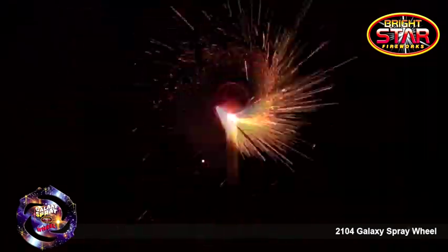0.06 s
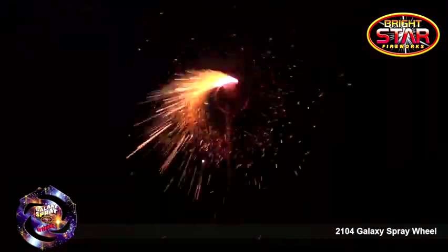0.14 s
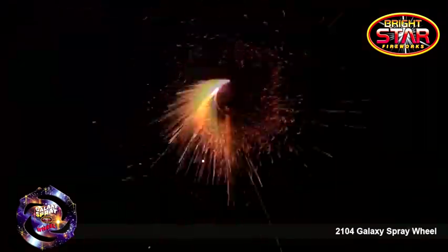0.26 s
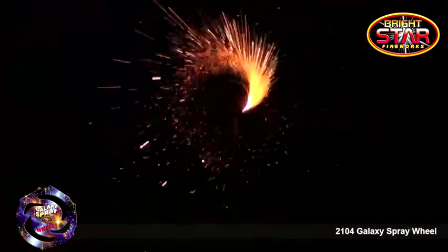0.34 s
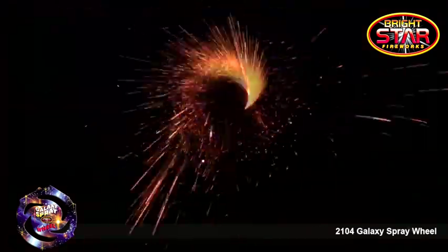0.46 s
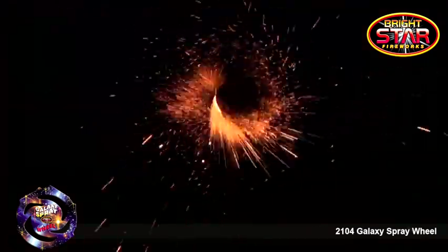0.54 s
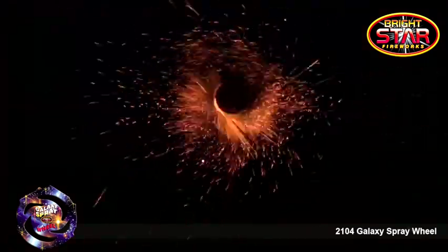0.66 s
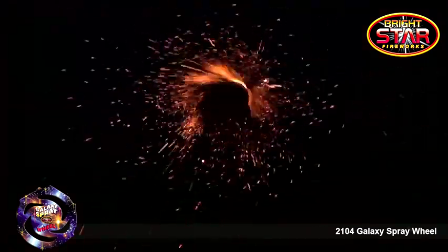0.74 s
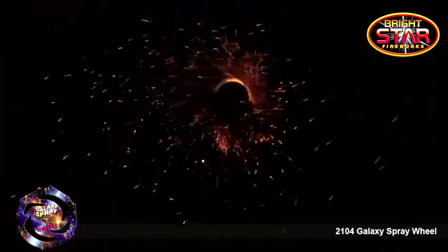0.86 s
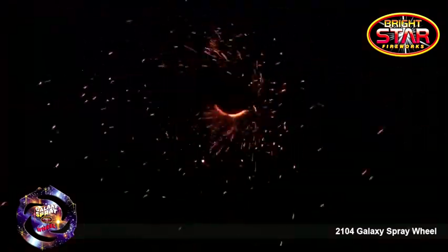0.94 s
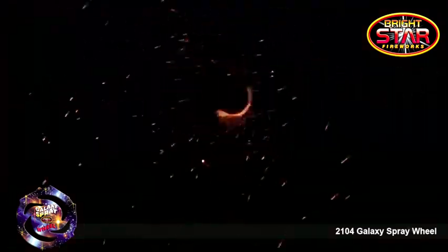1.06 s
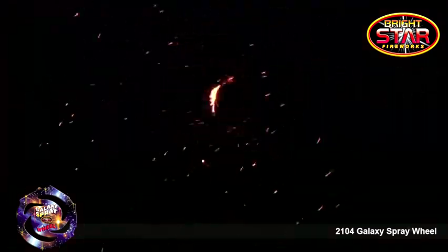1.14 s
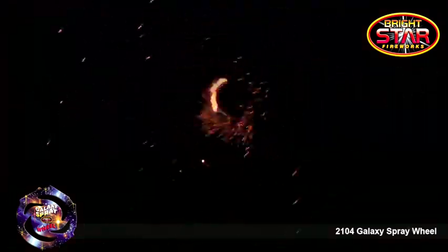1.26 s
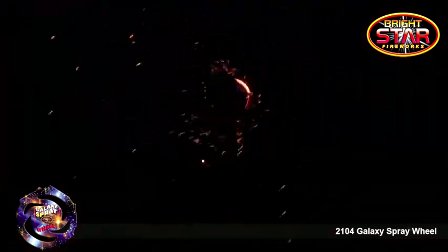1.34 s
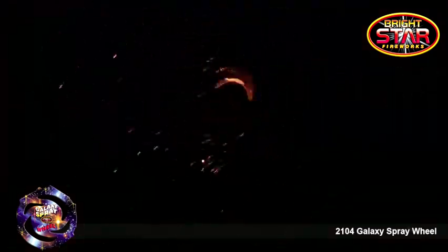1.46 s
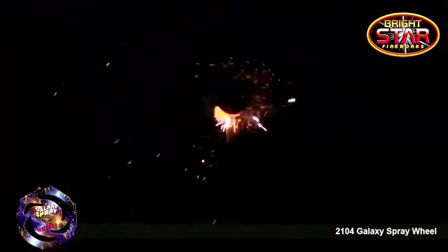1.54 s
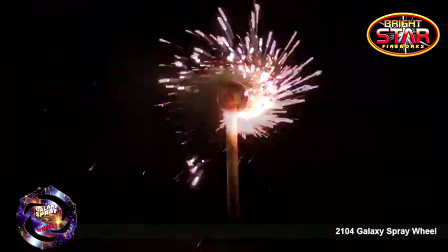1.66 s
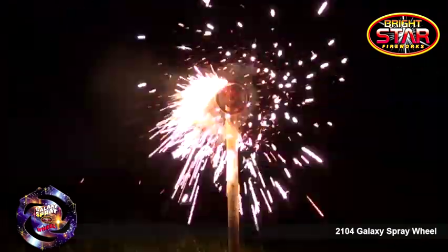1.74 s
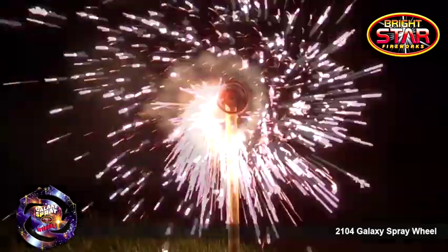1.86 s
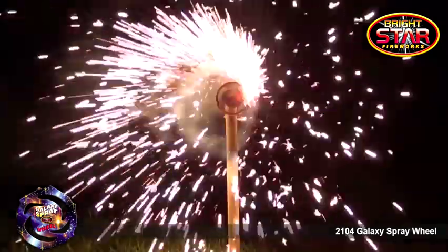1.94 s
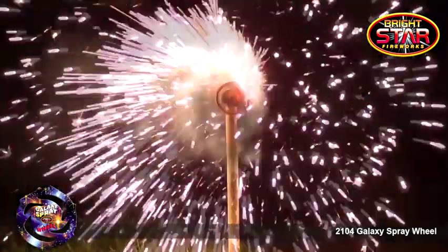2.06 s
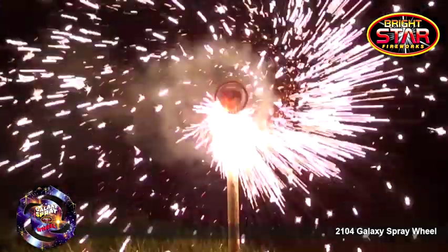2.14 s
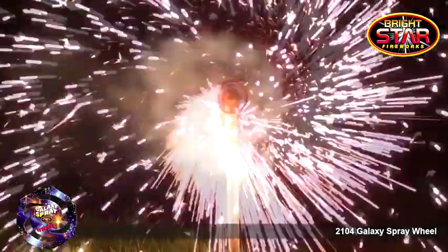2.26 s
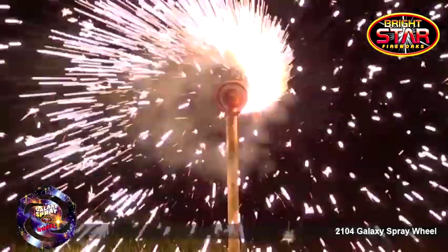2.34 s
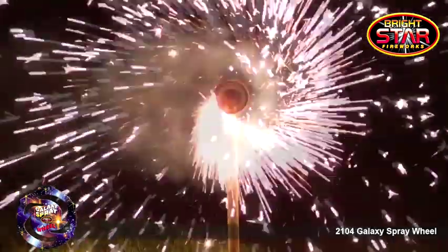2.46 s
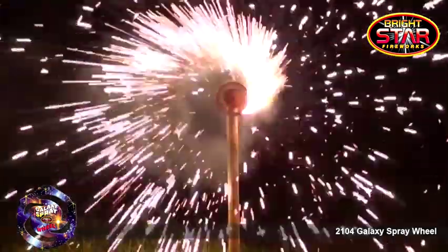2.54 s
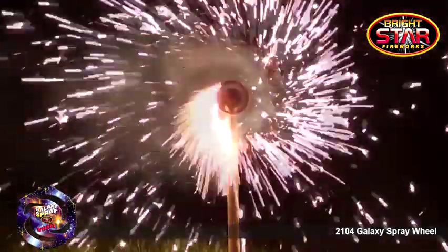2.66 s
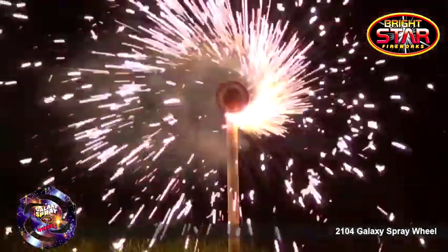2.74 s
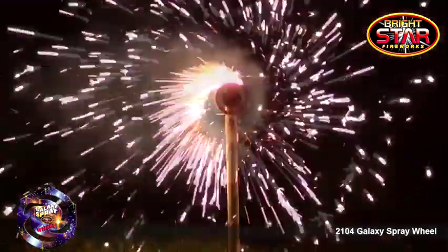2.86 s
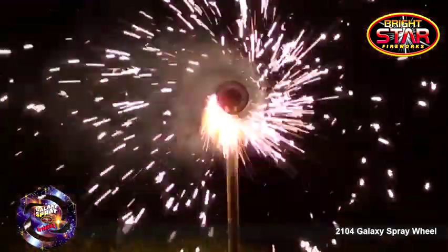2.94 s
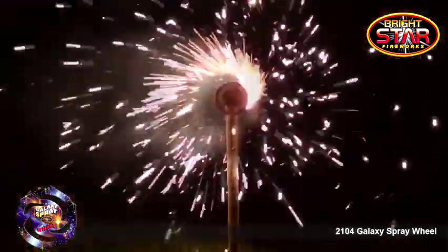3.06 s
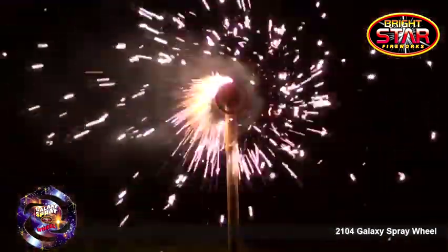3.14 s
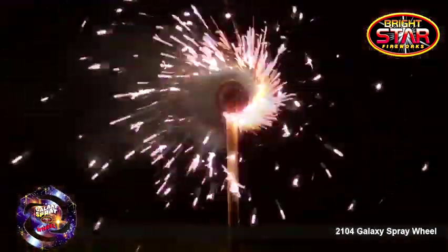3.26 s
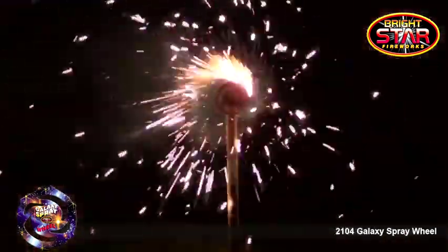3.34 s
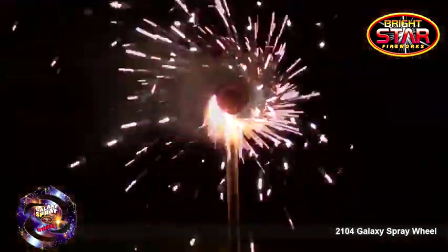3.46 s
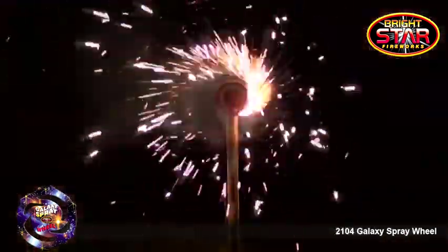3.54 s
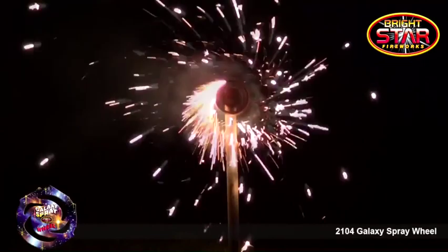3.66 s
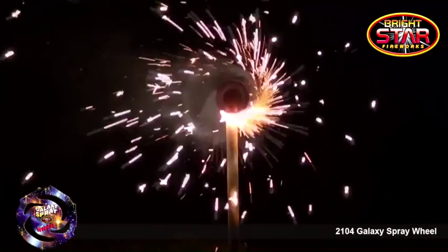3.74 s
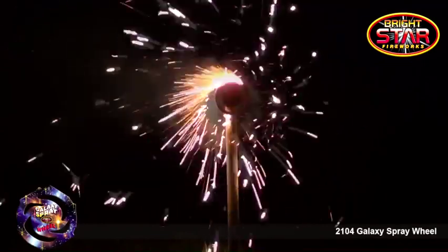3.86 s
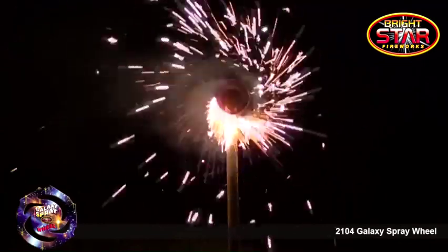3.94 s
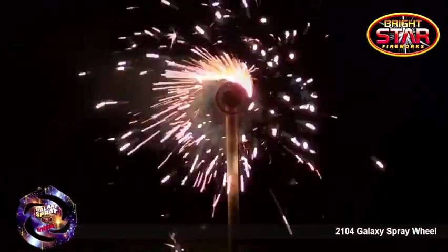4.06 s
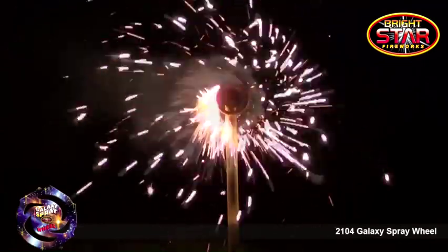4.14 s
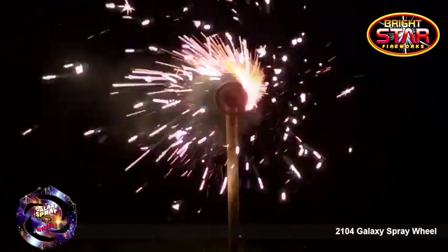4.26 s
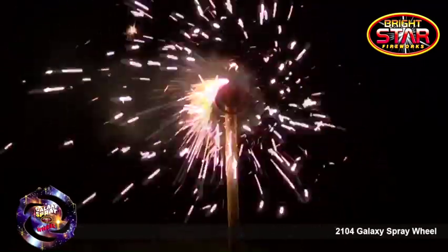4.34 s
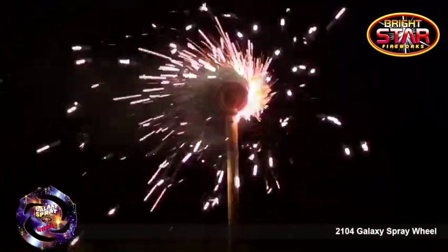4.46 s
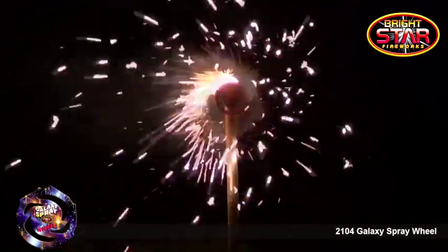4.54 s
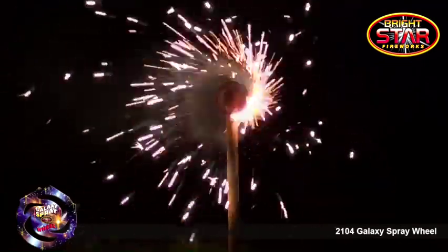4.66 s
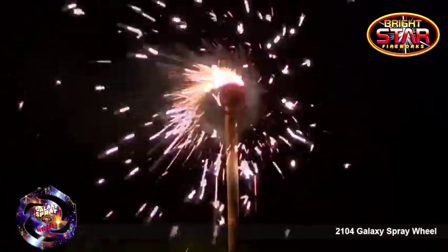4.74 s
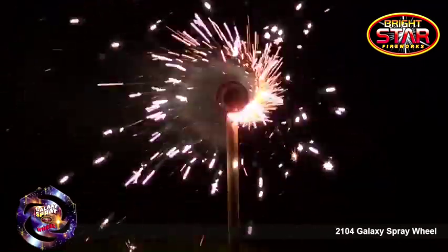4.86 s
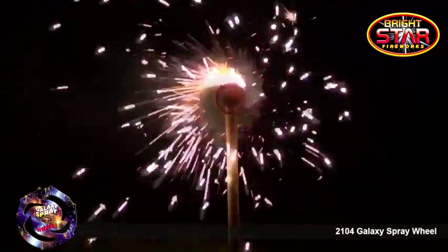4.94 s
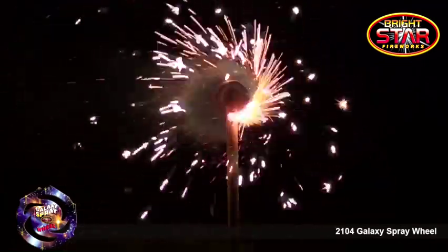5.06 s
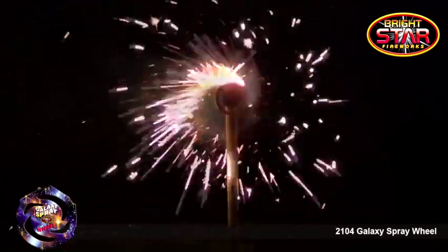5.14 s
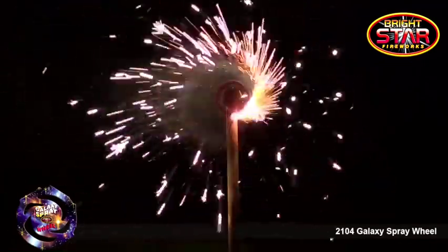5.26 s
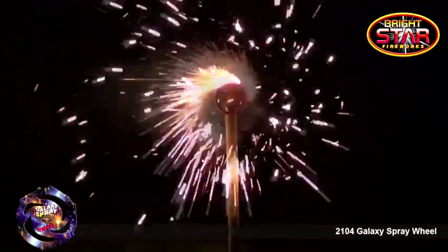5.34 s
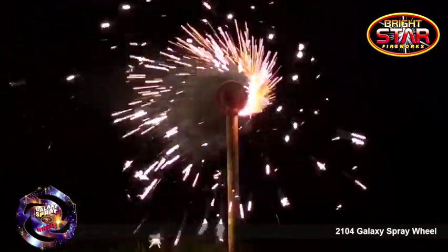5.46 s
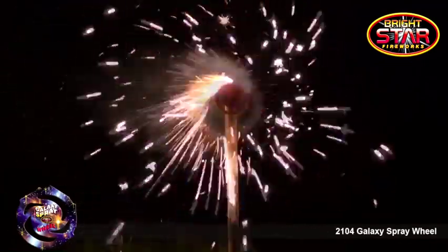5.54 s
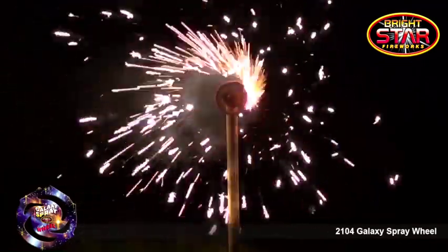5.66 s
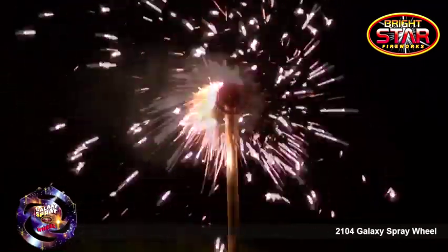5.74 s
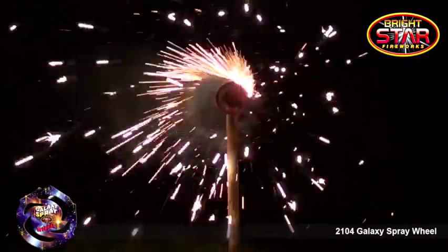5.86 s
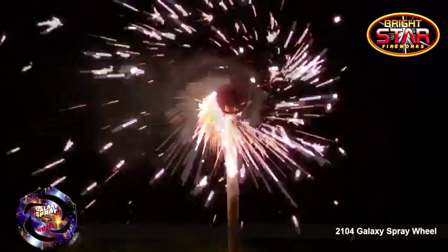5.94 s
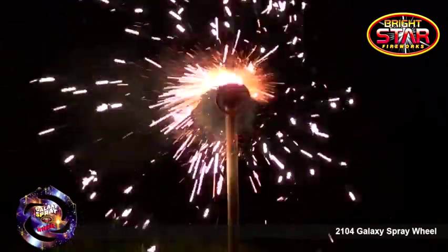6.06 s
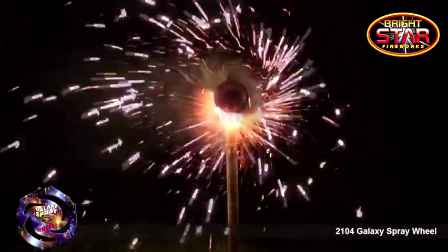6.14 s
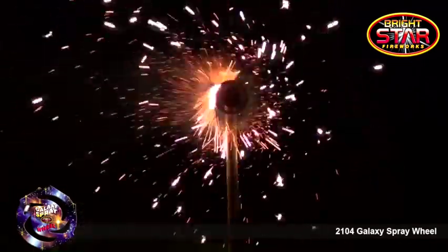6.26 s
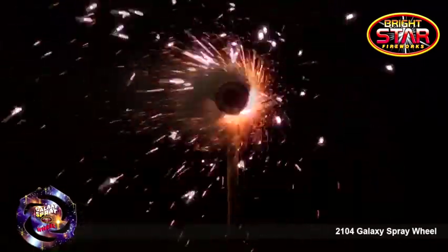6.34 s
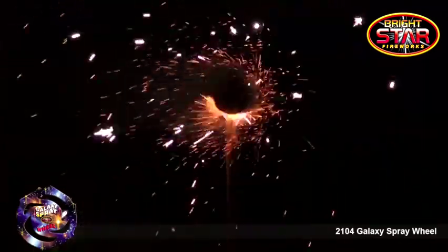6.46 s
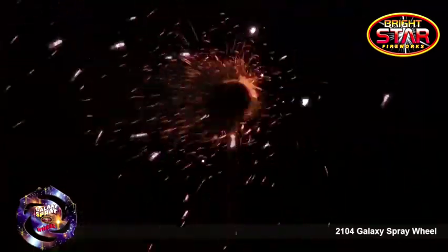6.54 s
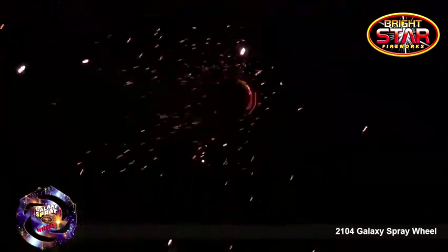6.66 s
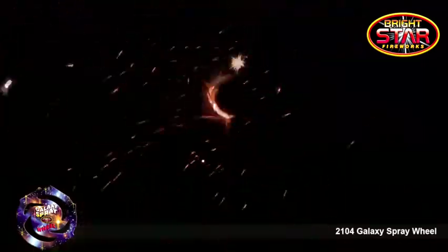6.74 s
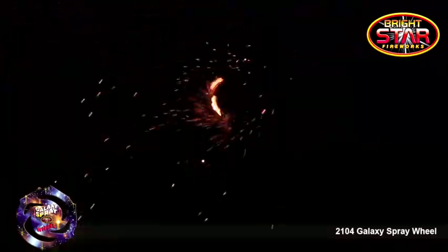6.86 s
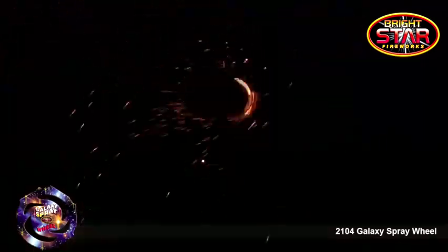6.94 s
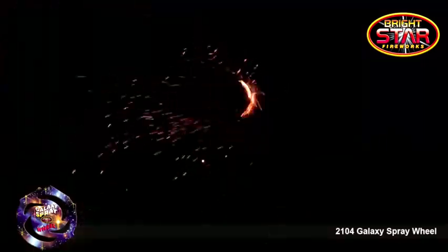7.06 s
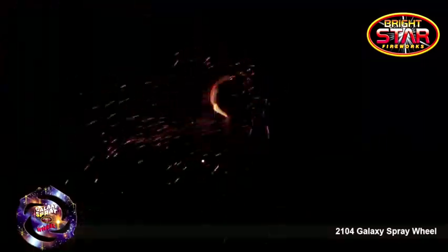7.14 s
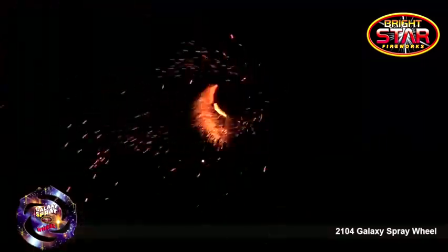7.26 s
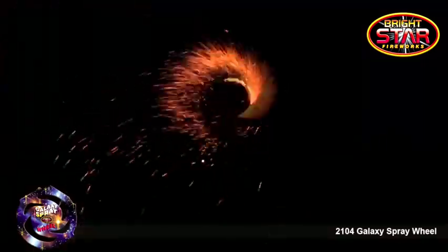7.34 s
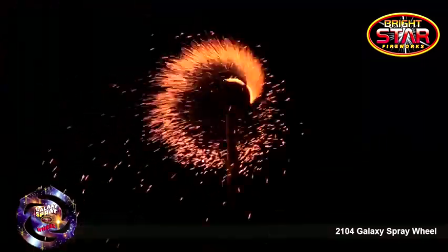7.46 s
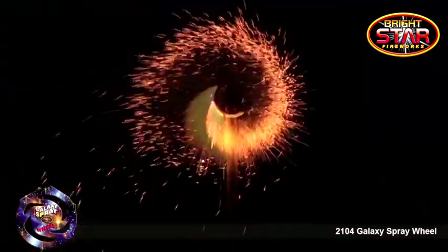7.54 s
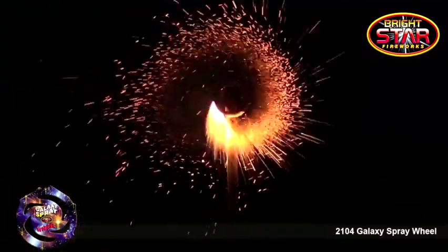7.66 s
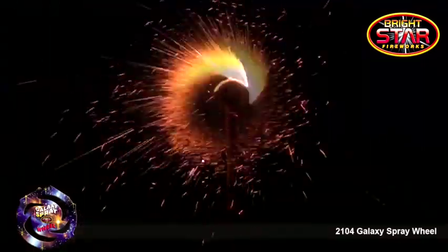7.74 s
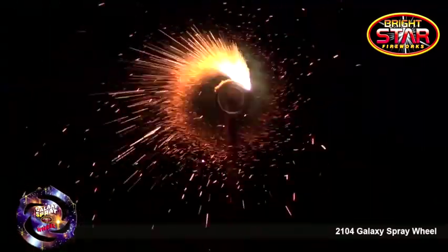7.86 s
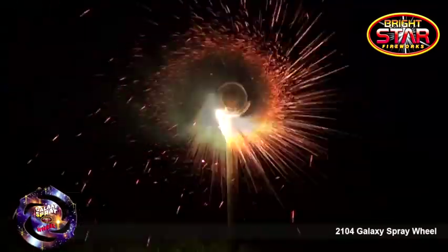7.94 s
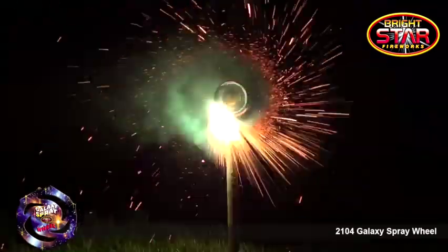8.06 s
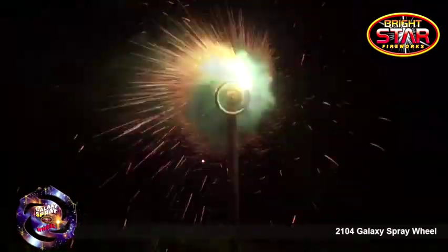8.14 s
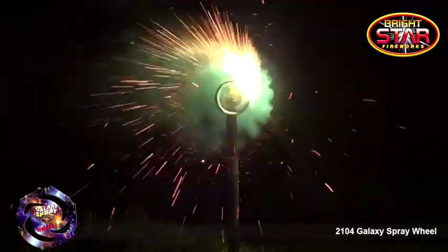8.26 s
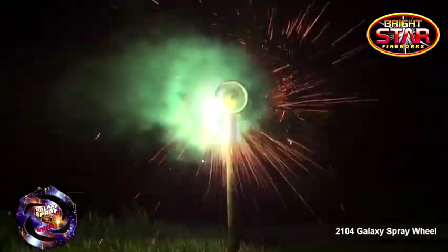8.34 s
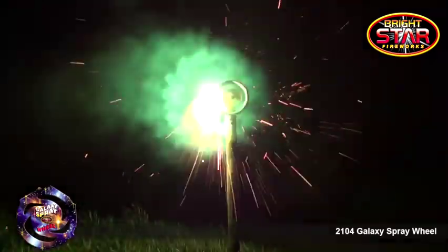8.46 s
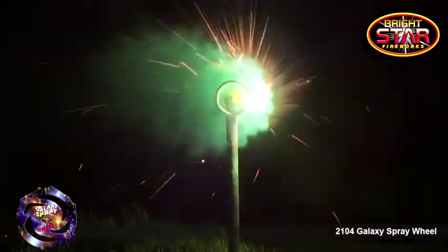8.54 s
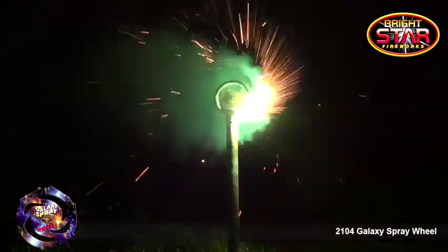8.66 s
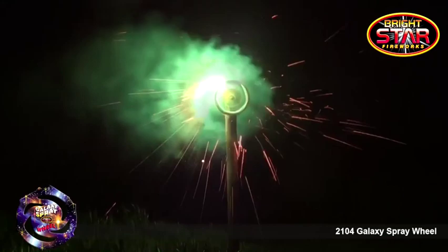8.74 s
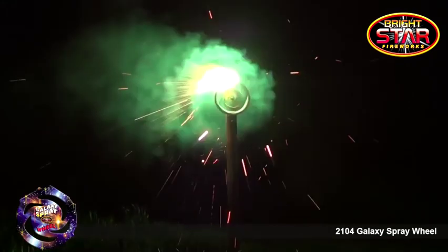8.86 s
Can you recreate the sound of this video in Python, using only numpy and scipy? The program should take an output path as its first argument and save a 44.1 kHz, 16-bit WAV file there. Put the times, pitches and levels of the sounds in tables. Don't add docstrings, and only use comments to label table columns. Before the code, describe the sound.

Harsh, bright gas-jet hiss swirls several times a second outdoors, cut by two quiet sputtering gaps with snapping embers before each roaring return.

```python
import sys
import numpy as np
from scipy import signal
from scipy.fft import rfft, irfft, next_fast_len
from scipy.io import wavfile
from scipy.ndimage import uniform_filter1d, map_coordinates

SR = 44100
rng = np.random.default_rng(int(sys.argv[2]) if len(sys.argv) > 2 else 0)


def gain_from_db(level_db):
    decades = np.asarray(level_db, float) / 20
    return 10 ** decades


def master(y):
    cut = np.clip(np.atleast_2d(y).T, -1, 1)
    pcm = np.round(cut * 32767)
    wavfile.write(sys.argv[1], SR, pcm.astype(np.int16))


N = 392049


def shape(x, *tables):
    size = 2048
    log_hz = np.log(np.fft.rfftfreq(size, 1 / SR) + 1)
    gain_db = sum(np.interp(log_hz, np.log(hz), db) for hz, db in map(np.transpose, tables))
    cepstrum = irfft(gain_db * np.log(10) / 20)
    cepstrum[1:size // 2] *= 2
    cepstrum[size // 2 + 1:] = 0
    response = irfft(np.exp(rfft(cepstrum)))[:size // 2]
    return signal.oaconvolve(x, response)[:len(x)]


def unit(x):
    return x / np.sqrt(np.mean(x ** 2))


def curve(rows):
    s, *columns = np.transpose(rows)
    return [np.interp(np.arange(N) / SR, s, column) for column in columns]


def walk(rate):
    hold = int(SR / rate)
    steps = np.repeat(rng.standard_normal(N // hold + 1), hold)
    return unit(uniform_filter1d(uniform_filter1d(steps, hold), hold)[:N])


def late(x, lag):
    return map_coordinates(x, [np.arange(len(x)) - lag], order=3)


def bumps(s, db, half_s):
    t = np.arange(N) / SR
    power = np.zeros(N)
    for at, peak_db, half in zip(s, db, half_s):
        near = slice(max(int((at - 4 * half) * SR), 0), int((at + 4 * half) * SR))
        power[near] += gain_from_db(2 * peak_db) * np.exp(-2 * ((t[near] - at) / half) ** 2)
    return power


# time in seconds, angle in turns (whole numbers with the nozzle on top).
WHEEL_TURNS = [(0.0, -0.05), (0.404, 2.63), (1.212, 8.36), (1.818, 12.27), (2.223, 15.1), (2.425, 16.98),
               (2.627, 19.04), (3.233, 25.79), (3.839, 32.41), (4.243, 36.71), (4.647, 40.92),
               (5.253, 47.0), (6.061, 54.73), (6.668, 60.13), (6.87, 61.71), (7.88, 68.98), (8.284, 72.07),
               (8.89, 76.89)]


def wheel_angle():
    return 2 * np.pi * curve(WHEEL_TURNS)[0]


def ground_lag(angle):
    mean_ms, swing_ms = 2.065, .16
    return (mean_ms + swing_ms * np.cos(angle)) * SR / 1000


def ground(x, lag):
    grass = [(300, -2.5), (1000, -1.5), (1600, -3), (2500, -5), (5500, -10), (8000, -16), (12000, -28)]
    return x + late(shape(x, grass), lag)


def hub(gas, angle):
    once = .026 * np.cos(angle - 3.46)
    twice = .009 * np.cos(2 * angle - 1.95)
    lag = (.143 + once + twice) * SR / 1000
    blur = signal.windows.gaussian(11, 1.38)
    return gas - .72 * late(np.convolve(gas, blur / blur.sum(), "same"), lag)


# lights in seconds, takes hold in seconds, level then in dB re full,
# full in seconds, cuts out in seconds.
STAGES = [
    (-.5, -.4, -15, -.3, .965),
    (1.425, 1.565, -17, 1.69, 6.49),
    (7.235, 7.46, -9.5, 7.61, 9.5),
]
# time in seconds, hiss in dB, fullness in dB.
THRUST = [(0, -27.5, -4.5), (.32, -28.5, -3), (.42, -28.5, 0), (.55, -28, -10.5), (.8, -28, -11),
          (1.75, -28.5, -2.5), (1.95, -28.5, -1), (2.29, -27.5, -6.5), (2.85, -29.5, -3.5),
          (3.45, -33.5, -0.5), (3.68, -30.5, -4), (3.9, -31, -1.5), (4.3, -29, -4), (5.0, -29, -0.5),
          (5.35, -28, -5.5), (6.0, -29, -1.5), (7.9, -27.5, -4), (8.3, -27, -8)]
# time in seconds, hiss in dB, half length in
# milliseconds, fullness in dB.
SPURTS = [(1.04, -56, 28, 23), (1.088, -55, 19, 18), (1.15, -61, 15, 13), (1.191, -55.5, 24, 9),
          (1.228, -57, 33, 14), (1.297, -55, 21, 11.5), (1.511, -46, 9.2, -39), (6.36, -42.5, 120, 12.5),
          (6.543, -55.5, 33, 27), (6.59, -49, 17, 5), (6.62, -58, 12, 11), (6.659, -52.5, 10, 0),
          (6.683, -58, 6, 6), (6.755, -53.5, 20, 14), (6.828, -58.5, 40, 10.5), (6.894, -64, 17, 18),
          (6.975, -60, 18, 9), (7.056, -55, 10, -9), (7.09, -62, 24, 11), (7.189, -40, 17, -4),
          (7.315, -42, 58, 7), (7.42, -38.5, 19, 3), (7.166, -53, 14, 3)]
PER_FULLNESS = (.9, .4, .05)


def burn():
    ember_db = -35.5
    rows = []
    for lights, hold, hold_db, full, cut in STAGES:
        rows += [(lights, ember_db), (lights + .04, -18.5), (hold, hold_db), (full, 0)]
        rows += [(cut - .19, 0), (cut, -5.5), (cut + .11, -25.5), (cut + .11 + .09, ember_db)]
    stage_db = curve(rows)[0]
    thrust_db, fullness_db = curve(THRUST)
    weak = 1 - np.exp(stage_db / 5)
    s, spurt_db, half_ms, spurt_full_db = np.transpose(SPURTS)

    def gain(steady_db, extra_db):
        steady = gain_from_db(2 * (thrust_db + stage_db + steady_db))
        return np.sqrt(steady + bumps(s, spurt_db + extra_db, half_ms / 1000))

    layer_db = (-12.5, -7, -4.5)
    weak_gain_db = (2.5, 2, -4)
    roar, rush, fizz = (
        gain(db + per * fullness_db * (1 - weak) + weak_db * weak, db + per * spurt_full_db)
        for db, per, weak_db in zip(layer_db, PER_FULLNESS, weak_gain_db))
    first_charge = np.arange(N) < STAGES[1][0] * SR
    rush = rush * gain_from_db(-3.5 * first_charge * (0.5 - weak))
    return roar, rush, gain(0, 0), fizz


BAND_EDGES_HZ = (1250, 4300, 11000)


def split_bands(x):
    size = next_fast_len(N)
    spectrum = rfft(x, size)
    octave = np.log2(np.fft.rfftfreq(size, 1 / SR) + 1)
    above = [np.clip(.5 + (octave - np.log2(edge)) / .3, 0, 1) for edge in BAND_EDGES_HZ]
    return [unit(irfft(spectrum * (low - high), size)[:N]) for low, high in zip([1] + above, above + [0])]


# frequency in Hz, level in dB.
JET_COLOUR = [(200, -40), (270, -16.5), (420, -12), (1000, -6), (1500, -7.5), (2200, -4), (5000, -7),
              (15500, -5.5)]
# frequency in Hz, gain in dB.
HUB_BALANCE = [(200, 11.5), (420, 8.5), (1000, 2.5), (2200, -1), (3600, -9), (5000, 0.5), (7200, 1.5), (10000, 0)]
# frequency in Hz, gain in dB.
CAMERA_BODY = [(2400, -4.5), (3050, -6.5), (3500, 4.5), (3900, 4), (4300, -6.5), (4650, -1), (6800, 1),
               (7550, -5), (8500, 3), (10100, 2.5), (10600, 0.5), (13200, 1), (14500, -8.5), (15400, -5)]
# frequency in Hz, gain in dB.
LAST_CHARGE = [(6800, -2.5), (8000, -0.2)]
# time in seconds, depth in dB.
THROB = [(0, 0.5), (2.3, 0.1), (3, 0.7), (3.8, 1.2), (4.4, 0.5), (4.9, 0.1), (8.89, 0)]


def jet(angle, lag):
    chance, size = rng.random((N, 2)).T
    sparks = (chance < 1500 / SR) * (2 * size - 1) ** 3
    turbulence = gain_from_db(0.5 * walk(45) + 0.78 * walk(350)) * rng.standard_normal(N)
    gas = hub(turbulence + gain_from_db(-11.5) * unit(sparks), angle)
    heard = ground(shape(gas, HUB_BALANCE, JET_COLOUR, CAMERA_BODY), lag)
    roar, rush, hiss, fizz = split_bands(heard)
    before_last = np.arange(N) < STAGES[-1][0] * SR
    hiss = np.where(before_last, hiss, shape(hiss, LAST_CHARGE))
    roar_gain, rush_gain, hiss_gain, fizz_gain = burn()
    roar = roar * roar_gain * gain_from_db(0.47 * walk(14) + 0.33 * np.cos(angle - 2.7))
    rush = rush * rush_gain * gain_from_db(0.42 * walk(19) + 0.47 * np.cos(angle - .7))
    hiss = hiss * hiss_gain * gain_from_db(.5 * walk(14))
    fizz = fizz * fizz_gain * gain_from_db(0.6 * walk(22))
    throb = gain_from_db(curve(THROB)[0] * np.cos(angle - 4.3))
    return roar + rush + throb * (hiss + fizz)


def scatter(wheel):
    level = np.sqrt(uniform_filter1d(wheel ** 2, size=4000))
    colour = [(200, -51.0), (350, 1.0), (800, -4.0), (1500, -40.0),
              (3500, 2.0), (4600, -2.0), (7000, -15.5), (10000, -45.)]
    return gain_from_db(-36.5) * level * unit(shape(rng.standard_normal(N), colour))


# frequency in Hz, level in dB per Hz.
BREEZE_COLOUR = [(12, -46), (20, -5), (54, -0.5), (112, 3), (193, -1.5), (240, -3.5), (310, -29),
                 (530, -120)]
# time in seconds, peak in dB, half length in seconds.
GUSTS = [(0, -56, .03), (.2, -69, .15), (.38, -62, 0.062), (.57, -67, .05), (0.896, -60.5, .03),
         (0.983, -63, .025), (1.09, -69, .03), (1.28, -76, .08), (1.51, -75, .03), (1.67, -62, .04),
         (1.95, -70, 0.36), (2.7, -71, 0.21), (2.96, -65, .04), (3.15, -69, .05), (4.18, -76, .05),
         (4.4, -70, .05), (4.53, -71, .04), (4.69, -66, .04), (5.0, -71, .18), (5.62, -71, .04),
         (6.15, -68, 0.17), (6.47, -67, 0.16), (6.66, -71, .07), (6.86, -70, .06), (7.7, -71, 0.19),
         (8.2, -75, 0.51), (8.567, -64.5, .035), (8.69, -71, .03), (8.82, -66.5, 0.026)]
# start in seconds, peak in dB, frequency in Hz.
PUFFS = [
    (0.364, -46, 137),
    (0.424, -52, 121),
    (0.874, -48, 94.2),
    (0.959, -51, 83.4),
    (1.649, -56, 113),
]


def breeze():
    colour = BREEZE_COLOUR + [(400, -68)]
    mid, side = (unit(shape(rng.standard_normal(N), colour)) * gain_from_db(1.0 * walk(32)) for _ in range(2))
    calm_power = gain_from_db(2 * (-74.5 - 2.5 * walk(8)))
    gust = np.sqrt(calm_power + bumps(*np.transpose(GUSTS)))
    mid = mid * gust
    t = np.arange(3000) / SR
    for s, db, hz in PUFFS:
        swell = t / .008 * np.exp(1 - t / 0.006)
        mid[int(s * SR):][:3000] += gain_from_db(db + 0.5) * np.sin(2 * np.pi * hz * t) * swell
    return mid, side * gust * gain_from_db(-8)


# frequency in Hz, level in dB.
NIGHT_COLOUR = [(200, -40), (300, -4.5), (1000, -13), (4500, -19), (6000, -19.5), (15500, -23)]


def night():
    mid, side = (unit(shape(rng.standard_normal(N), NIGHT_COLOUR)) for _ in range(2))
    return gain_from_db(-63) * shape(mid, CAMERA_BODY), gain_from_db(-65.0) * shape(side, [(5000, -7.0), (10000, -23.0)])


# start in seconds, peak in dB, crackle in milliseconds.
SNAPS = [
    (1.3743, -28, 1.7),
    (6.7458, -27.5, .05),
    (6.681, -42, .5),
    (7.056, -47, 1.),
    (7.1858, -33, .3),
]
# frequency in Hz, gain in dB.
EMBER_RING = [(1000, 0), (2300, 7), (3500, -8), (4600, -2), (6000, 5), (9200, 10), (11000, -2),
              (13000, -19)]


def snaps(lag):
    out = np.zeros(N)
    t = np.arange(600) / SR
    step = .3 * np.exp(-t / 4e-4) - np.exp(-t / 4e-5)
    for (s, db, ms), noise in zip(SNAPS, rng.standard_normal((len(SNAPS), 600))):
        start = int(s * SR)
        crackle = noise * np.exp(-(t * 1000 / ms) ** 2) + .25 * noise * np.exp(-t * 500 / ms)
        snap = shape(step + .6 * ms * shape(crackle, EMBER_RING), JET_COLOUR, CAMERA_BODY)
        out[start:][:600] += gain_from_db(db) * ground(snap / np.abs(snap).max(), lag[start])
    return out


# middle in seconds, centre frequency in Hz, level in dB.
WIDE_FLECKS = [(2.075, 7600, -43), (2.075, 11300, -40), (2.075, 13700, -46), (2.725, 9650, -40),
               (2.725, 13700, -49), (3.143, 6250, -47), (3.143, 8300, -43), (3.329, 10750, -43),
               (3.492, 8250, -39), (4.56, 6300, -40), (4.815, 10700, -39), (4.908, 8300, -39),
               (4.908, 11700, -43), (5.233, 5500, -41), (5.233, 8300, -40), (5.883, 5150, -41),
               (5.883, 7950, -42), (5.953, 7900, -41), (8.02, 4650, -43), (8.646, 7600, -43)]


def wide_flecks():
    out = np.zeros(N)
    hz = np.fft.rfftfreq(2048, 1 / SR)
    for (s, centre, db), noise in zip(WIDE_FLECKS, rng.standard_normal((len(WIDE_FLECKS), 2048))):
        band = unit(irfft(rfft(noise) * (np.abs(hz - centre) < 900)))
        out[int(s * SR) - 1024:][:2048] += gain_from_db(db + 5) * band * np.hanning(2048) ** 2
    return np.array([out, -out])


def scene():
    angle = wheel_angle()
    lag = ground_lag(angle)
    wheel = jet(angle, lag) + snaps(lag)
    wind_mid, wind_side = breeze()
    night_mid, night_side = night()
    mid = wheel + wind_mid + night_mid
    side = scatter(wheel) + wind_side + night_side
    return np.array([mid + side, mid - side])


def band_limit(x):
    return signal.sosfilt(signal.butter(12, 15850, fs=SR, output="sos"), x)


def record(dry):
    rounded = np.tanh(1.502 * dry) / 1.503 + wide_flecks()
    low_pass = signal.ellip(12, .2, 80, 15680, fs=SR, output="sos")
    return band_limit(signal.sosfilt(low_pass, rounded))


dry = scene()
out = record(dry)
master(out)
```